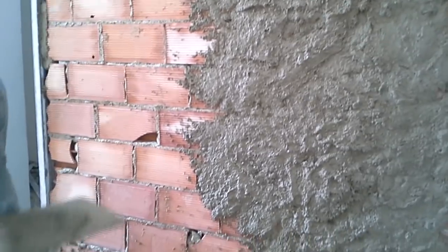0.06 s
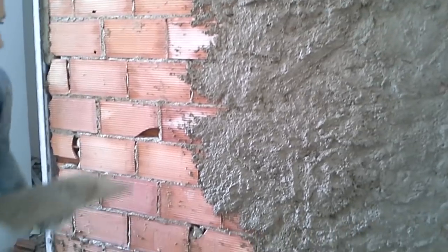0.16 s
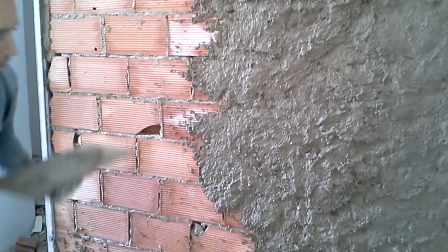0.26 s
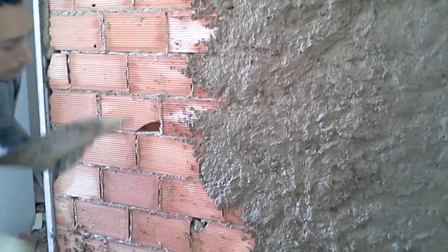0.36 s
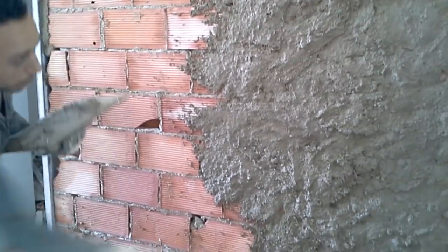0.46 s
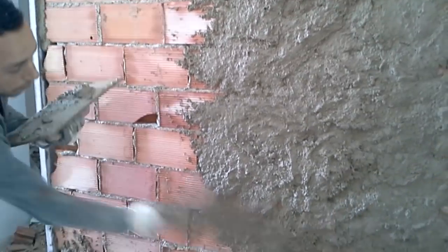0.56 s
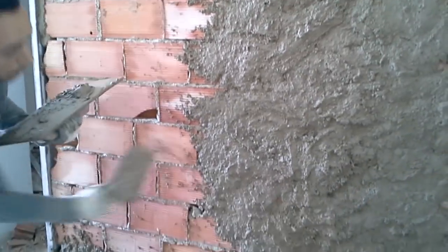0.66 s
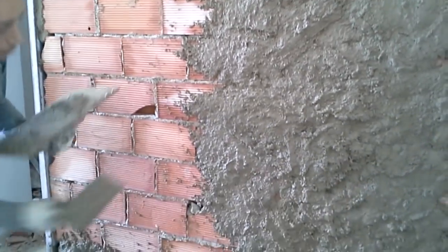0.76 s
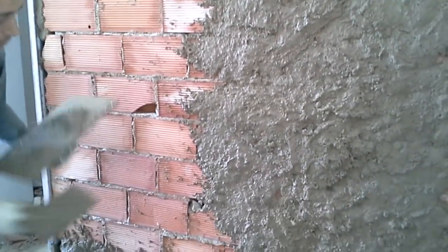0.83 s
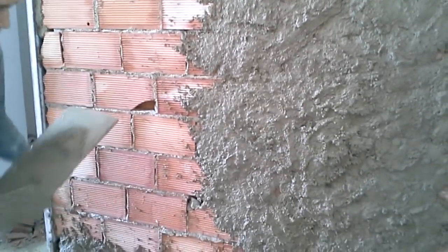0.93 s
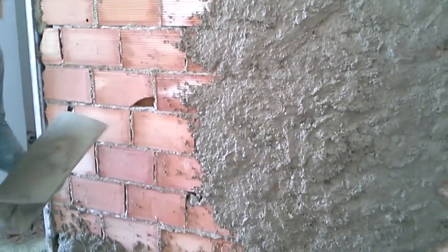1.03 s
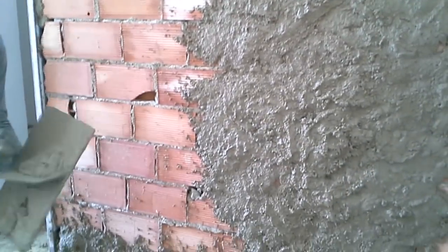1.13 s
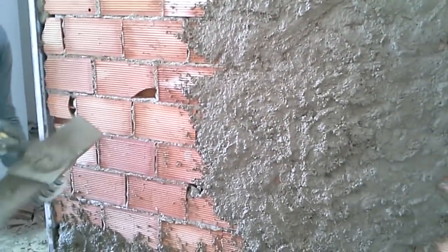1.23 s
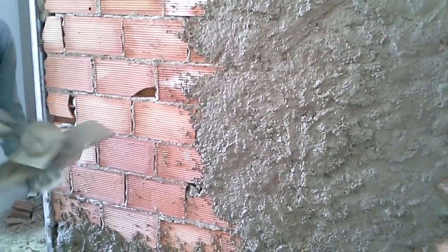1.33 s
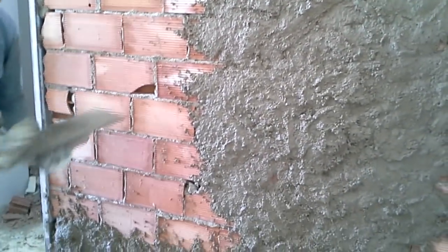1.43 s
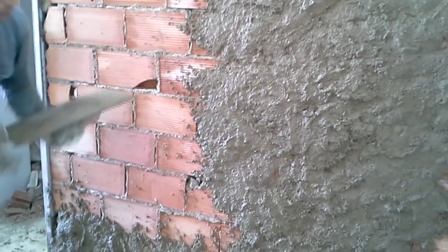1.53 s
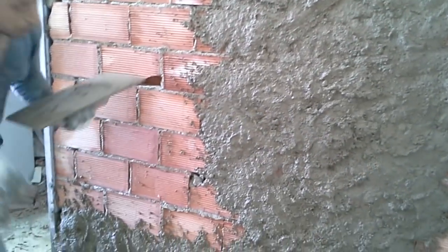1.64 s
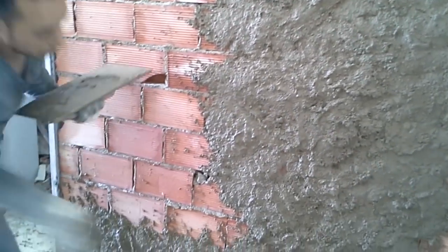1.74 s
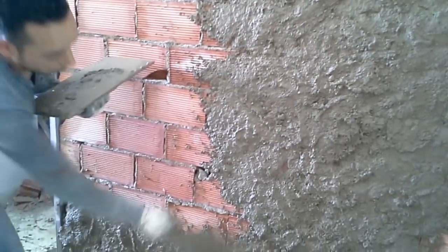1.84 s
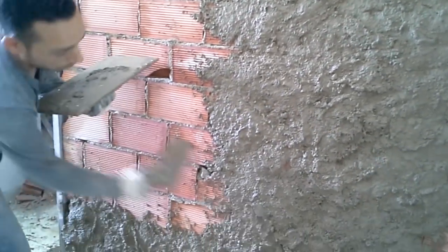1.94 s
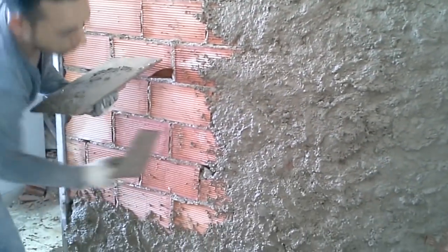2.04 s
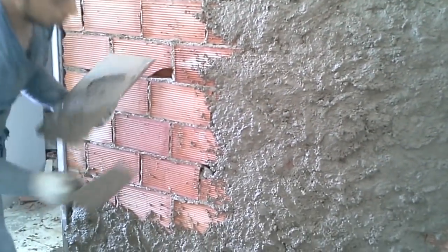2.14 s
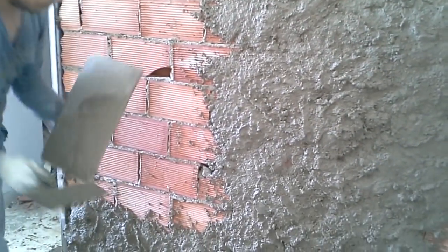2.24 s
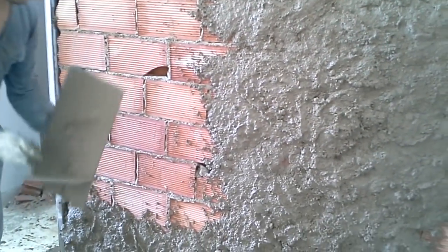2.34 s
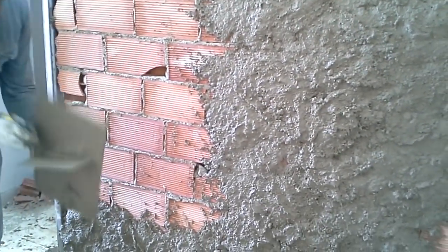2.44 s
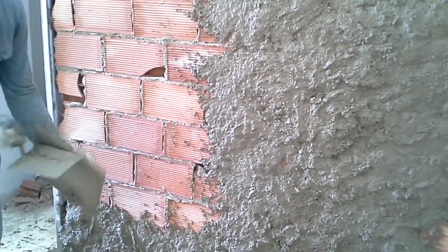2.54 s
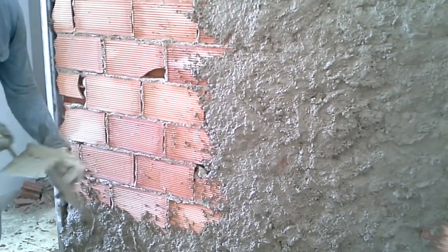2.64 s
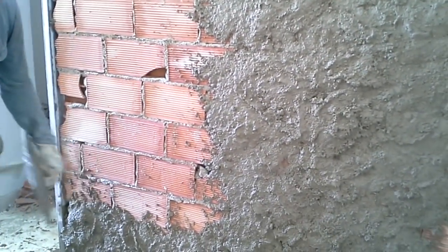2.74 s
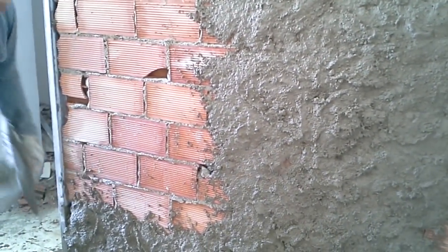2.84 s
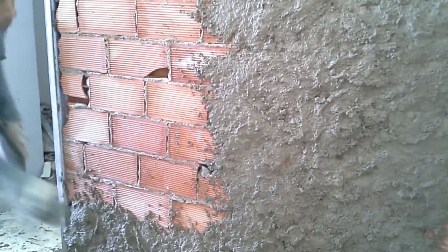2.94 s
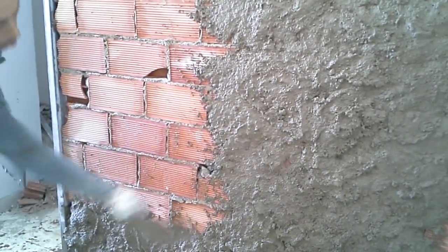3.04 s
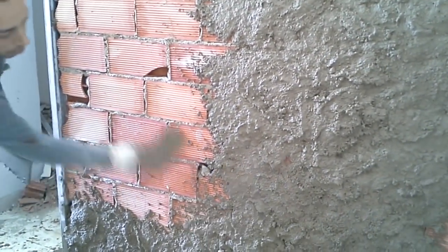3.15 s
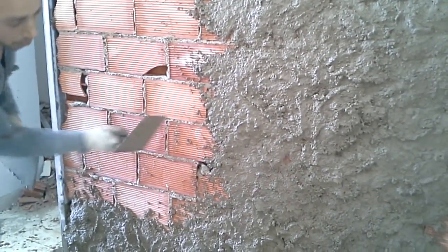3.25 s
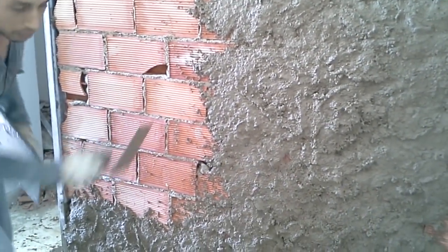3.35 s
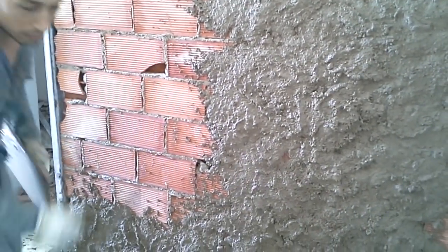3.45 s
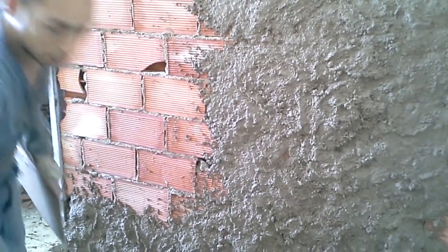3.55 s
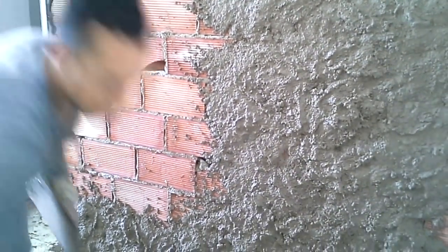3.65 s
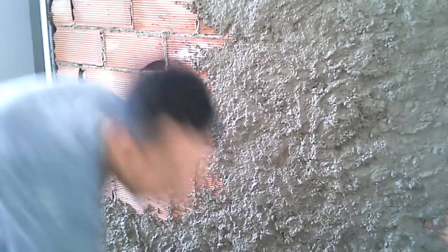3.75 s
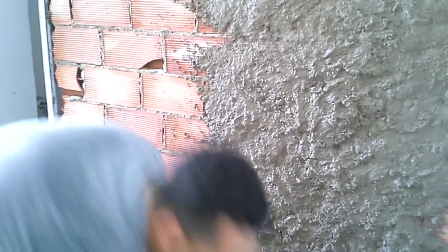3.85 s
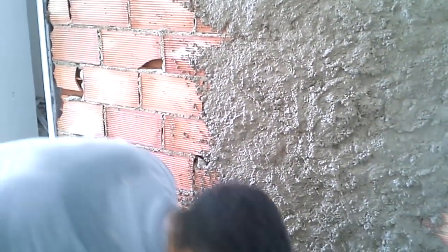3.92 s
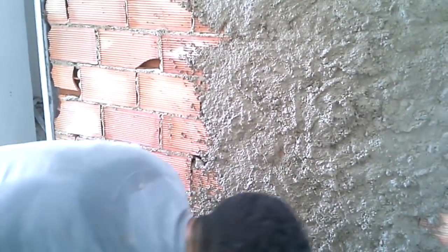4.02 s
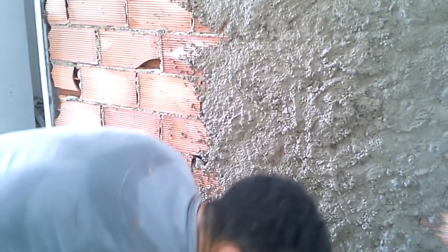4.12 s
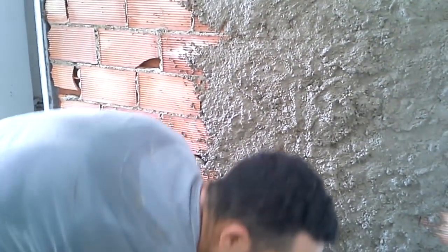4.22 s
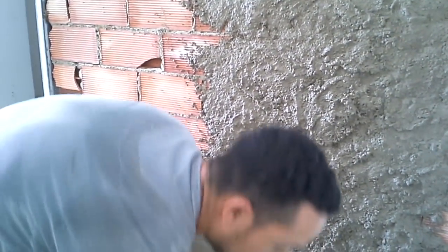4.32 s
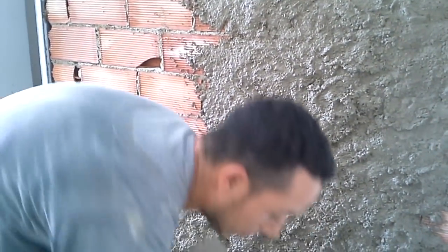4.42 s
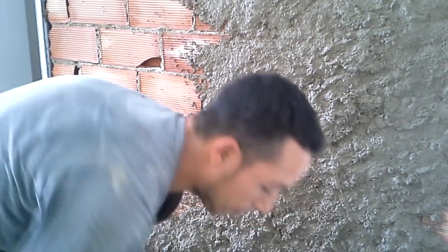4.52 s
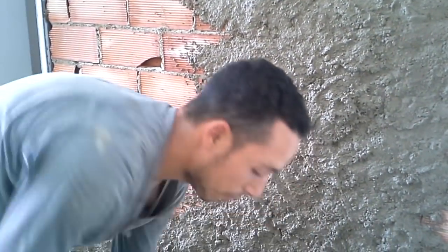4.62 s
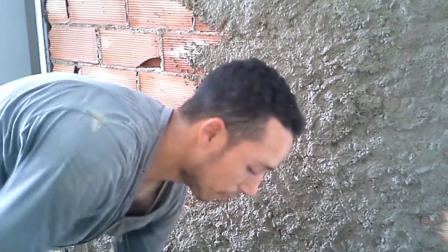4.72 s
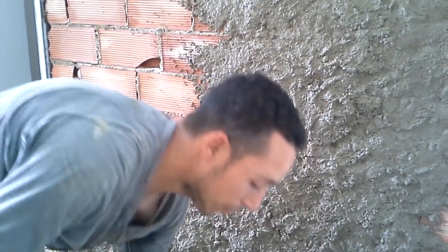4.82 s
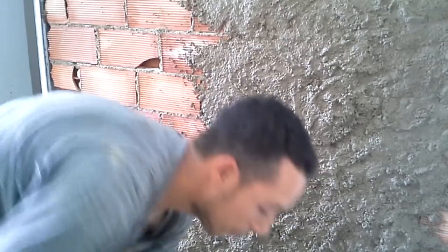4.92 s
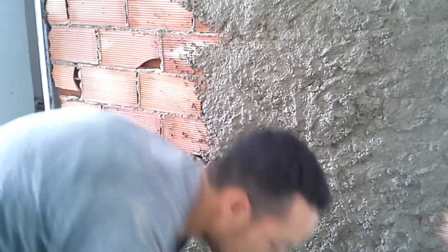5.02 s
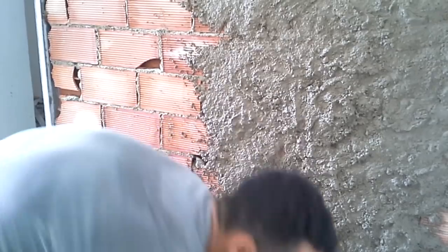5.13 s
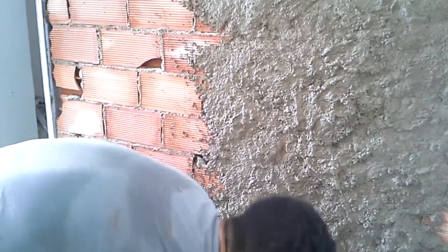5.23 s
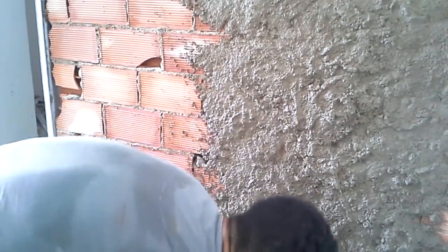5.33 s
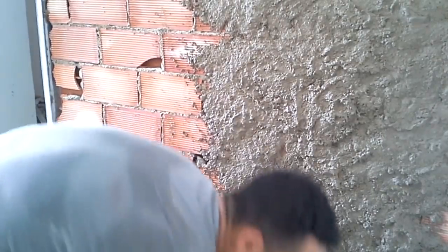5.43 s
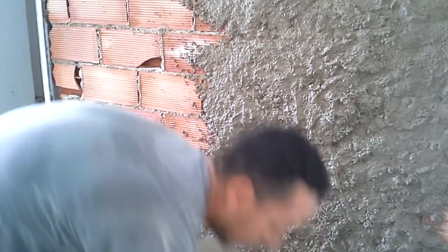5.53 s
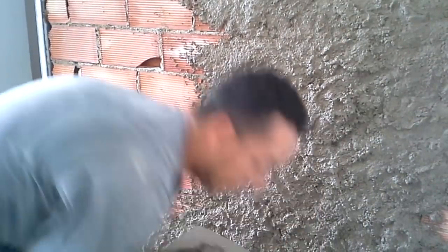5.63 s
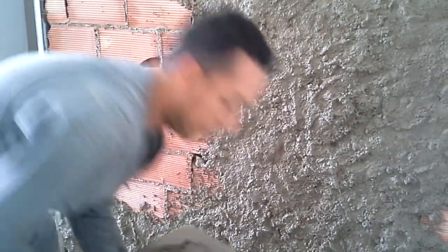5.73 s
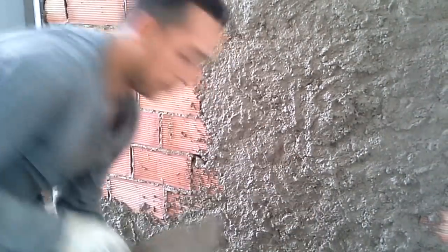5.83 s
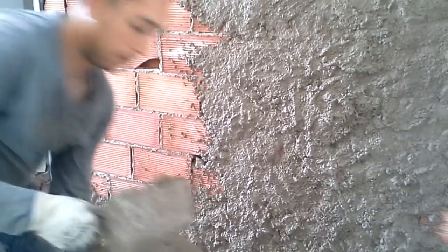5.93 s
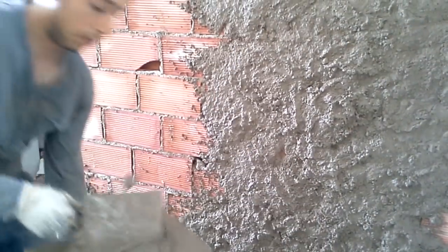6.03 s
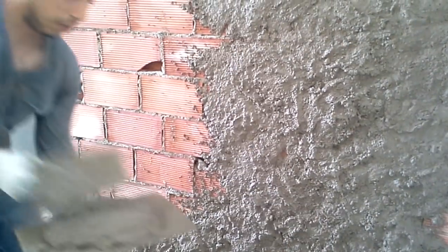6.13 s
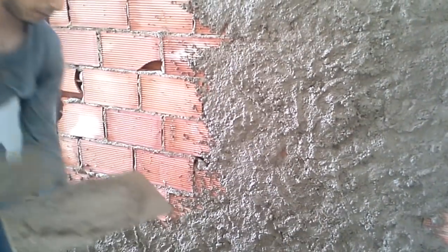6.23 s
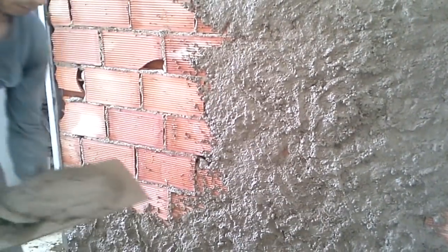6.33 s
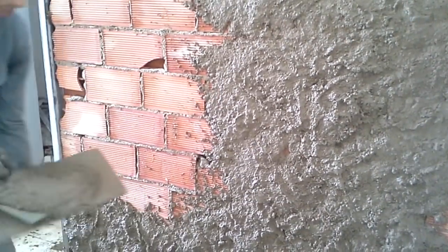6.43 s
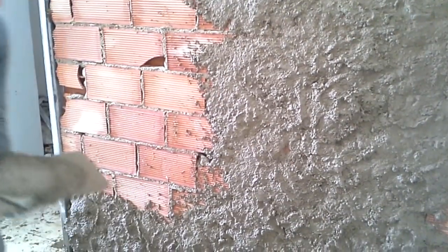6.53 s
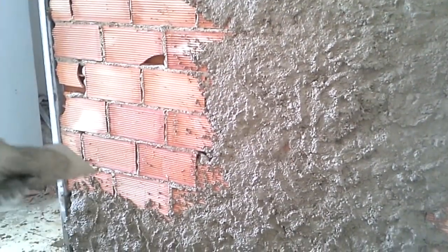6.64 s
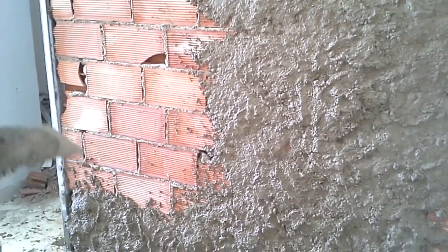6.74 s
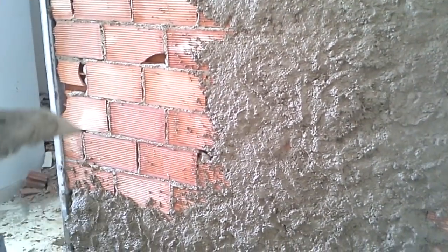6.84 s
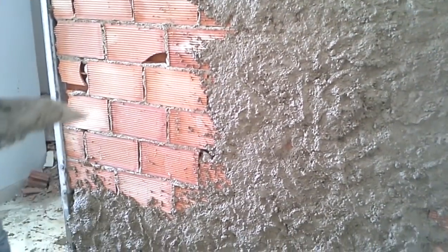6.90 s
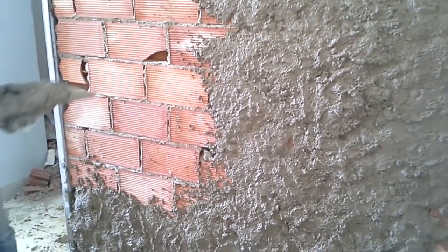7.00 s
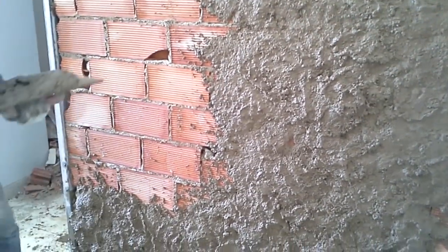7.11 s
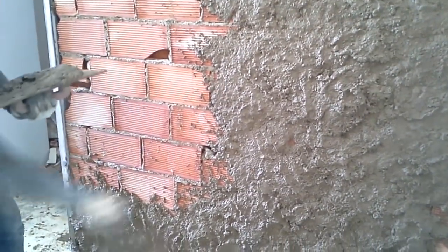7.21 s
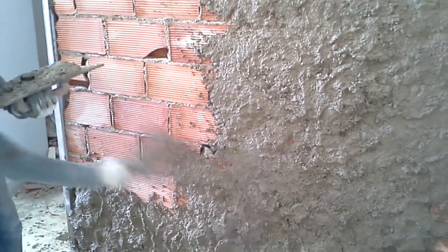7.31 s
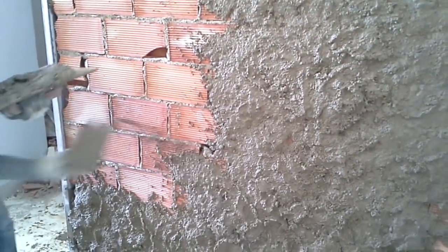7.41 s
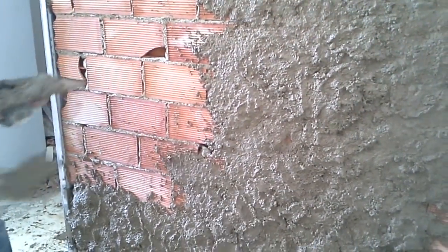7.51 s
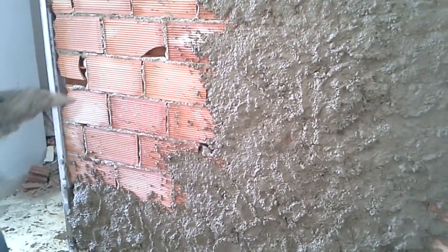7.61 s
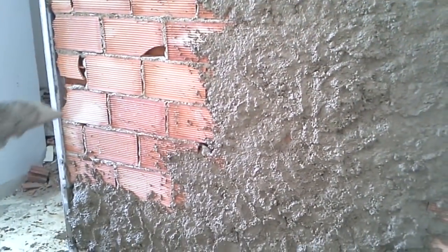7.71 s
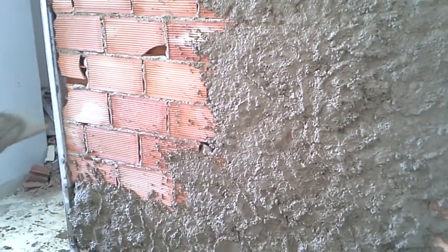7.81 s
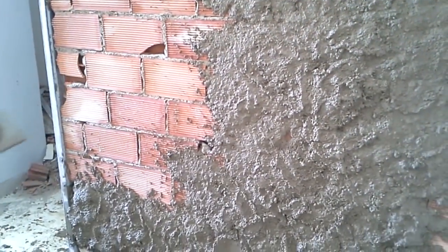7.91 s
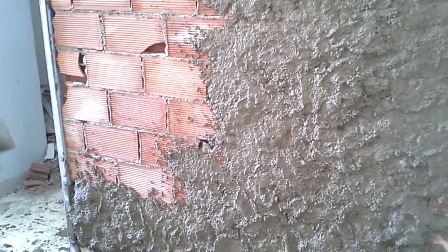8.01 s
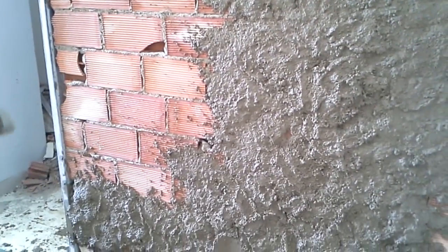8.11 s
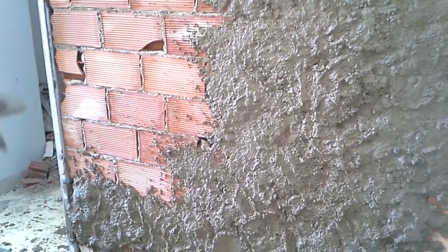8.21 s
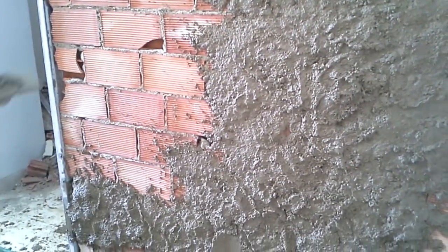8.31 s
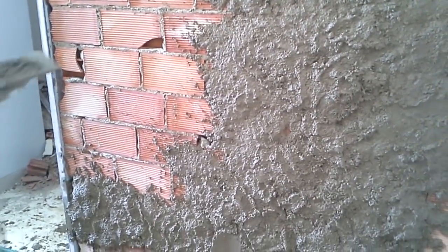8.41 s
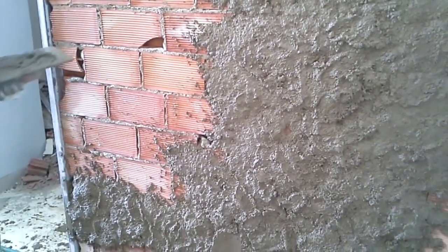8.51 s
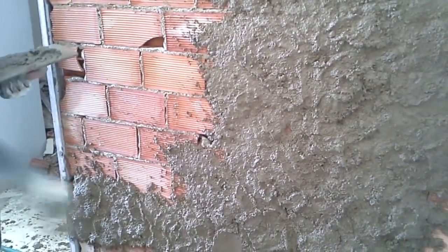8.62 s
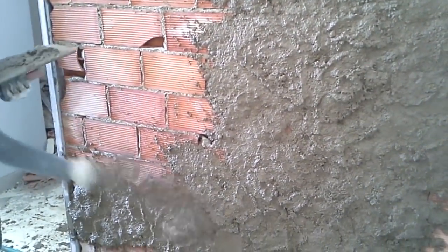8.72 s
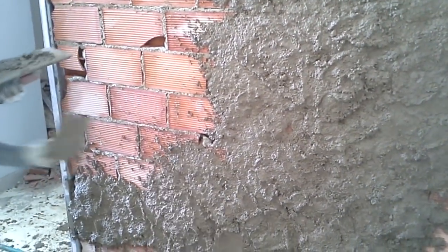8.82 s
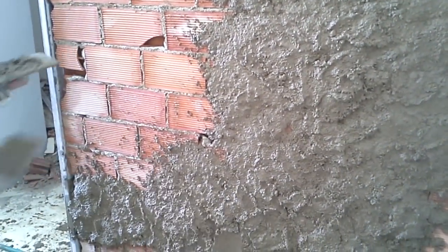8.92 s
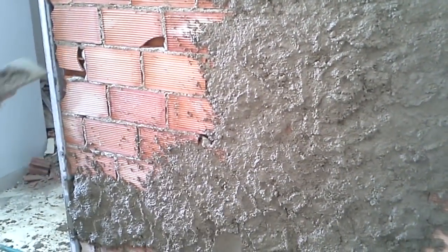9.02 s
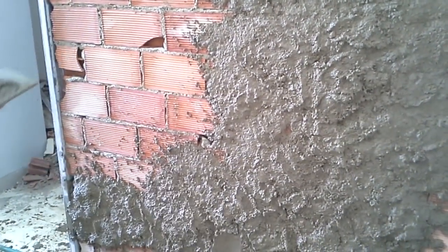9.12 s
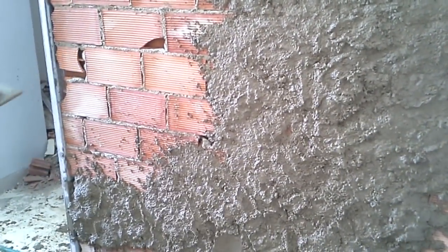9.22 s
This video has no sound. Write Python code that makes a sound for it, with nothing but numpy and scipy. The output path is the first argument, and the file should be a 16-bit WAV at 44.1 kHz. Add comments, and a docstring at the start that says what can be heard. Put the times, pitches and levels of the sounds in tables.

```python
"""Throwing mortar onto a wall

A plasterer flings wet mortar from a trowel onto a brick wall in a bare, echoing room.
Between throws he scrapes a new load off his hawk; halfway through he bends to dig more out of the tub.
Slaps, scrapes and knocks are random clicks sent through damped resonances and random reflections.
Faint site noise lies behind; a nearby stereo camera overloads on the hardest throws."""
import sys
import numpy as np
from scipy import signal
from scipy.fft import rfft, irfft, next_fast_len
from scipy.io import wavfile

SR = 44100
rng = np.random.default_rng(int(sys.argv[2]) if len(sys.argv) > 2 else 0)


def bounce(signal):
    """Save signal as a 16-bit WAV file at the path given by the first command-line argument."""
    frames = np.transpose(np.atleast_2d(signal))
    limited = np.clip(frames, -1, 1)
    pcm = np.round(limited * 32767).astype(np.int16)
    wavfile.write(sys.argv[1], SR, pcm)


N = 408366  # length of the scene [samples]


# throws that hit the wall: (time [s], level [dB], bass [dB], treble [dB],
# wall boom against the slap [dB], thud of the lump [Hz], smack of the trapped air [Hz])
SLAPS = [(0.0887, -9, 3.5, -4, -13.5, 637, 1400), (1.3903, -12, 2.5, -0.5, -14, 294, 3260),
         (2.6240, -15.5, 3.5, 3.5, -20.5, 282, 820), (6.8225, -6.5, -4, -11, -19.5, 311, 1530),
         (8.2474, -8, 4.5, -3.5, -18.5, 208, 1260)]
# spectrum of the wet splat: (frequency [Hz], relative level [dB per Hz])
SPLAT_SPECTRUM = [(30, 1), (80, -15), (170, -6.5), (290, -12), (420, -7.5), (700, 0.5), (1500, -1),
                  (2500, -4.5), (4200, -4), (7000, -11), (10000, -17.5), (15000, -32)]
# resonances of the wall: (frequency [Hz], width [Hz], relative level [dB])
WALL_MODES = [(83.2, 3.1, -1), (148.1, 3.7, -0.5), (194, 9.7, -18), (289, 6.5, -13)]
SPATTER_S = 0.014  # decay time of the spatter [s]
SMACK_DB = 1  # thud and smack against the splat, on top of the slap's own level [dB]


def slaps():
    """Each load lands on a new spot: the lump thuds, air smacks out from under it, and the wall booms."""
    out = np.zeros((2, N))
    wall = blow(ring(WALL_MODES, size=32768))
    for start, db, bass_db, treble_db, boom_db, thud_hz, smack_hz in SLAPS:
        tones = ring([(thud_hz, thud_hz / 7, -2), (smack_hz, smack_hz / 3, 0)])
        # the share of thud and smack grows with the throw
        lump = body(colour(SPLAT_SPECTRUM, bass_db, treble_db), tones, db + SMACK_DB)
        splat = signal.fftconvolve(impact(0.0041, SPATTER_S, spatter_db=-6), lump)
        add(out, start, undb(db) * room(splat, direct_db=-6.5, lead_s=0))
        # the long waves of the boom reach both microphones alike
        add(out, start, undb(db + boom_db) * wall)
    return out


def impact(squash_s, spatter_s, spatter_db):
    """A contact or a wet lump landing: a dense crack while it flattens, then sparser droplets."""
    t = seconds(0.13)
    crack = grains(t, 16000, 1.4) * (np.exp(-t / squash_s) - np.exp(-4 * t / squash_s))
    spatter = grains(t, 3000, 4.07) * np.exp(-t / spatter_s)
    burst = blow(crack) + undb(spatter_db) * blow(spatter)
    return blow(even(even(burst)))


SLIDE_S = 0.055  # the slide fills this time before each slap [s]
SLIDE_FIRST_DB, SLIDE_LAST_DB = -39.5, -28  # level at its start and end [dB]
SLIDE_BASS_DB, SLIDE_TREBLE_DB, SLIDE_RING_DB = -9, 16, -10


def slides():
    """Strokes of the load leaving the trowel in the swing: a hiss that grows until the slap."""
    return [(slap - SLIDE_S, SLIDE_S, SLIDE_FIRST_DB, SLIDE_LAST_DB,
             SLIDE_BASS_DB, SLIDE_TREBLE_DB, SLIDE_RING_DB) for slap, *_ in SLAPS]


# the trowel takes a new load off the hawk: (touch [s], bite [s], run-out length [s], level at the touch [dB],
# level at the bite [dB], bass [dB], treble [dB], steel ring [dB], knock of the bite [dB])
SCOOPS = [(.551, 0.597, .04, -13, -13, 19, -1, 0.5, -17),
          (1.883, 1.921, .18, -13, -11.5, 13, -3, -2, -12.5),
          (7.36, 7.474, 0.024, -17.5, -14, -6.5, 0.5, -28, -20),
          (8.758, 8.862, 0.039, -25.5, -21, 10, 3.5, -8, -19.5)]
# after the bite, all against the push [dB]
RUN_OUT_FIRST_DB, RUN_OUT_LAST_DB, RUN_OUT_BASS_DB, RUN_OUT_TREBLE_DB = -2, -8, -23, 5
SCRAPE_RING_DB = -17.5  # ring of the steel in run-outs and light strokes [dB]


def scoops():
    """Two strokes for each scoop: a push into the load, then a fading, thinner, brighter run-out."""
    pushes, run_outs = [], []
    for touch, bite, length, first_db, db, bass_db, treble_db, ring_db, _ in SCOOPS:
        pushes.append((touch, bite - touch, first_db, db, bass_db, treble_db, ring_db))
        run_outs.append((bite, length, db + RUN_OUT_FIRST_DB, db + RUN_OUT_LAST_DB,
                         bass_db + RUN_OUT_BASS_DB, treble_db + RUN_OUT_TREBLE_DB, SCRAPE_RING_DB))
    return pushes + run_outs


# light strokes that gather and smooth the mortar on the hawk:
# (time [s], length [s], level at the start [dB], treble [dB])
SCRAPES = [(0.438, 0.13, -52, 15), (2.09, .11, -21, -14), (2.361, 0.16, -48, 7.5), (3.094, 0.39, -41, 8),
           (5.287, 0.37, -38.5, 8), (5.875, .1, -20.5, -2), (5.985, .14, -24, 9.5),
           (6.158, 0.087, -32.5, 4), (6.473, 0.071, -36, 1), (6.559, 0.23, -43, 6), (6.869, 0.051, -9, 10),
           (7.036, 0.047, -16, 13), (7.08, .14, -32, -8), (7.239, 0.13, -39, 4), (7.819, 0.21, -38.5, 10),
           (8.012, 0.048, -31, -1), (8.109, 0.18, -30, 13), (9.079, 0.14, -54, 2)]
REST_DB, SCRAPE_BASS_DB = -45.5, 7.5  # level at the end of each stroke, and its bass [dB]


def scrapes():
    """Light strokes: however firmly they start, they end under the blade's own weight."""
    return [(start, length, first_db, REST_DB, SCRAPE_BASS_DB, treble_db, SCRAPE_RING_DB)
            for start, length, first_db, treble_db in SCRAPES]


# spectrum of gritty mortar under the blade: (frequency [Hz], relative level [dB per Hz])
GRIT_SPECTRUM = [(40, -92.5), (110, -22), (200, -14.5), (320, -3), (500, -0.5), (850, 3.5), (1300, 3.5),
                 (2500, -1), (4300, -2.5), (7000, -8.5), (10000, -14), (15000, -27)]
# resonances of the steel blade: (frequency [Hz], width [Hz], relative level [dB])
STEEL_MODES = [(540, 25, -43), (641, 4.9, -1.5), (788, 96, 9.5), (916, 20, 4.5), (924, 30, -29.5),
               (1110, 31, -3), (1494, 32, -0.5), (1860, 160, -1), (2066, 42, -7), (2720, 40, -45),
               (3610, 50, -8)]


def hawk():
    """Slides, scoops and scrapes: sandy mortar crunches and the steel blade rings."""
    return strokes(slides() + scoops() + scrapes(), GRIT_SPECTRUM, STEEL_MODES,
                   rate=2200, spread_db=4.5, judder_db=5.5, judder_hz=125.6,
                   pop_db=-10, pop_low_hz=647, pop_high_hz=2420, direct_db=-5.5)


# the trowel digs and cuts in the tub:
# (time [s], length [s], level at the start [dB], bass [dB], treble [dB])
DIGS = [(3.408, 0.032, -14, 1, 3), (3.448, .19, -32, -2, 7), (3.676, 0.096, -25, -3.5, -14),
        (3.788, 0.05, -28.5, -7, -2.5), (4.152, 0.074, -40, 6, 18), (4.208, 0.026, -21.5, 0.5, 16),
        (4.621, .055, -43, -5, 8), (4.712, 0.036, -23, -14, 15), (4.734, 0.022, -14, -30, 5),
        (4.822, .1, -30, 1, -19), (5.141, 0.031, -40.5, -24, -3)]
DIG_FADE_DB, DIG_RING_DB = 5, -11.5  # loss of level over each dig; ring of the tub [dB]


def digs():
    """Strokes in the tub, all losing the same force as the mix gives way."""
    return [(start, length, first_db, first_db - DIG_FADE_DB, bass_db, treble_db, DIG_RING_DB)
            for start, length, first_db, bass_db, treble_db in DIGS]


# spectrum of the mix in the tub: (frequency [Hz], relative level [dB per Hz])
MUD_SPECTRUM = [(40, -76), (110, -15), (250, 8.5), (450, 6.5), (900, 1), (1500, -2), (2600, -5),
                (4500, -7.5), (8000, -15), (15000, -24.5)]
# resonances of the tub: (frequency [Hz], width [Hz], relative level [dB])
TUB_MODES = [(237, 67, -18), (314, 39, 10), (420, 41, 11), (626, 37, 13.5), (700, 50, 5), (945, 85, 15.5)]


def tub():
    """Digs in the wet mix: fewer grains, lower air pops, and the ring of the tub."""
    return strokes(digs(), MUD_SPECTRUM, TUB_MODES,
                   rate=1500, spread_db=2, judder_db=9, judder_hz=111.8,
                   pop_db=-16, pop_low_hz=298, pop_high_hz=970, direct_db=-2)


def strokes(table, spectrum, modes, rate, spread_db, judder_db, judder_hz,
            pop_db, pop_low_hz, pop_high_hz, direct_db, edge_s=0.0042):
    """Steel drags through mortar: grains crunch under a blade that sticks and slips, and the mix squelches."""
    out = np.zeros((2, N))
    rung = ring(modes)
    for start, length, first_db, last_db, bass_db, treble_db, ring_db in table:
        t = seconds(length)
        slips = rng.uniform(-1.5, 1, int(length * judder_hz) + 2)
        judder = undb(judder_db * np.interp(t * judder_hz, np.arange(len(slips)), slips))
        edges = np.clip(np.minimum(t, length - t) / edge_s, 0, 1)
        pressure = undb(np.linspace(first_db, last_db, len(t))) * edges
        force = pressure * unit(even(judder * grains(t, rate, spread_db)))
        sound = signal.fftconvolve(force, body(colour(spectrum, bass_db, treble_db), rung, ring_db))
        # a bright, dry scrape squelches less than a dull, deep one
        squelch = pressure * pops(t, 90, pop_low_hz, pop_high_hz, cycles=4.2, glide=0.076)
        add(sound, 0, undb(pop_db - treble_db / 2) * squelch)
        # the tools keep moving, so every stroke meets other reflections
        add(out, start, room(sound, direct_db))
    return out


def pops(t, rate, low_hz, high_hz, cycles, glide):
    """Air pockets open in the wet mix: brief resonances that rise in pitch."""
    out = np.zeros(len(t) + SR // 20)
    age = seconds(1 / 20)
    for place, pitch, size in rng.random((int(t[-1] * rate) + 1, 3)):
        turns = low_hz * (high_hz / low_hz) ** pitch * age
        rising = turns * (1 + glide * np.tanh(turns / cycles))
        pop = np.exp(-turns / cycles) * np.cos(2 * np.pi * rising)
        add(out, place * t[-1], (0.25 + size) * pop)
    return unit(out[:len(t)])


# blade knocks and falling clots: (time [s], level [dB], treble [dB])
KNOCKS = [(1.084, -44, 5), (3.232, -45, 5), (3.497, -27.5, -6), (4.135, -32, -10), (4.211, -26, 2),
          (4.678, -35, -6), (4.930, -33, -8), (5.541, -29.5, 4), (5.635, -44, 9), (5.844, -17, 4.5),
          (6.707, -39.5, -6), (7.144, -27, -15), (7.268, -35.5, 2), (7.818, -38, 9), (7.876, -40.5, 14),
          (8.639, -42.5, 0), (8.695, -44.5, 27)]
KNOCK_BASS_DB, KNOCK_RING_DB = 4.5, -8  # bass of every knock; steel ring of the lone ones [dB]
TOUCH_DB = -11.5  # knock of a scoop's touch, against the start of its push [dB]
SCOOP_KNOCK_TREBLE_DB, SCOOP_KNOCK_RING_DB = -6.5, 0.5


def contacts():
    """Lone knocks, and the touch and bite of each scoop: (time [s], level [dB], treble [dB], ring [dB])."""
    rows = [(start, db, treble_db, KNOCK_RING_DB) for start, db, treble_db in KNOCKS]
    for touch, bite, _, first_db, *_, bite_db in SCOOPS:
        rows.append((touch, first_db + TOUCH_DB, SCOOP_KNOCK_TREBLE_DB, SCOOP_KNOCK_RING_DB))
        rows.append((bite, bite_db, SCOOP_KNOCK_TREBLE_DB, SCOOP_KNOCK_RING_DB))
    return rows


def knocks():
    """Short contacts, damped by the mortar that clings to the tools."""
    out = np.zeros(N)
    steel = ring(STEEL_MODES)
    for start, db, treble_db, ring_db in contacts():
        response = body(colour(GRIT_SPECTRUM, KNOCK_BASS_DB, treble_db), steel, ring_db)
        knock = signal.fftconvolve(impact(0.002, 0.0045, spatter_db=2.0), response)
        add(out, start, undb(db) * knock)
    return out


# the steel edge sings on one narrow resonance: (time [s], length [s], pitch [Hz], level [dB])
SQUEALS = [(.548, 0.0397, 633, -9.5), (.552, 0.062, 1490, -18), (.548, 0.03, 2820, -23.5),
           (3.416, .042, 2060, -26), (8.102, 0.11, 4600, -33), (8.114, .15, 9900, -45)]
# sand caught under the edge rasps in a broad band: (time [s], length [s], centre [Hz], level [dB])
RASPS = [(3.091, .038, 2120, -36), (4.111, 0.012, 2340, -26.5), (4.73, 0.019, 3270, -21),
         (5.282, 0.033, 4080, -36), (6.476, 0.071, 1860, -38.5), (6.698, 0.026, 4150, -35),
         (7.438, 0.077, 3500, -13), (7.521, 0.13, 3200, -30.5), (7.876, 0.0062, 1900, -22),
         (8.757, 0.019, 1500, -21)]
SQUEAL_Q, RASP_Q = 35, 2.7  # pitch over width, approached by long friction
SETTLE_S = 0.017  # friction briefer than this stays much broader [s]
# the blade also groans at each bite, level against the bite's knock
GROAN_S, GROAN_HZ, GROAN_WIDTH_HZ, GROAN_DB = 0.034, 910, 170, 1


def frictions():
    """Squeals, rasps and groans: (time [s], length [s], pitch [Hz], width [Hz], level [dB])."""
    rows = []
    for table, q in [(SQUEALS, SQUEAL_Q), (RASPS, RASP_Q)]:
        for start, length, hz, db in table:
            rows.append((start, length, hz, hz / q * (1 + SETTLE_S / length), db))
    for _, bite, *_, bite_db in SCOOPS:
        rows.append((bite - GROAN_S / 4, GROAN_S, GROAN_HZ, GROAN_WIDTH_HZ, bite_db + GROAN_DB))
    return rows


def squeals():
    """Friction feeds one resonance of the blade for a moment."""
    out = np.zeros(N)
    for start, length, hz, width, db in frictions():
        t = seconds(length)
        swell = np.sqrt(np.abs(np.sin(np.pi * t / length)))
        rubbing = even(swell * grains(t, 6000, 0.57))
        # a second, broad resonance trims what lies far from the pitch
        resonance = signal.fftconvolve(ring([(hz, width, 0)]), ring([(hz, hz / 2, 0)], size=512))
        squeal = signal.fftconvolve(rubbing, resonance / np.linalg.norm(resonance))
        add(out, start, undb(db) * squeal)
    return out


# the blade bumps the side of the tub: (time [s], level [dB])
BUMPS = [(3.415, -24.5), (3.496, -32), (3.690, -34), (4.135, -38), (4.678, -36.5), (4.832, -37)]


def bumps():
    """Cushioned by the mortar, a bump wakes the resonances of the tub."""
    out = np.zeros(N)
    boom = blow(ring(TUB_MODES))
    for start, db in BUMPS:
        add(out, start, undb(db) * boom)
    return out


# spectrum of the site noise: (frequency [Hz], relative level [dB per Hz])
SITE_SPECTRUM = [(30, -27), (80, -17), (150, -7.5), (300, -7), (800, -6), (1500, -7), (3000, -9.5),
                 (5000, -9.5), (7000, -16), (15000, -22)]
# the background swells and ebbs: (time [s], level [dB])
SITE_LEVEL = [(0, -42.5), (1.2, -51.5), (3.0, -51.5), (4.1, -48.5), (5.2, -49.5), (5.8, -54), (6.4, -56.5),
              (7.0, -44), (9.2, -48.5)]


def site():
    """Faint noise of the building site: coloured random noise, with one second of lead-in."""
    level_db = np.interp(np.arange(N + SR) / SR - 1, *np.transpose(SITE_LEVEL))
    return signal.fftconvolve(undb(level_db) * rng.standard_normal(N + SR), colour(SITE_SPECTRUM))


# the room's reverberation: (frequency [Hz], time to fall by 60 dB [s])
ROOM_DECAY = [(80, 0.69), (200, 0.63), (450, 0.57), (800, 0.5), (1600, 0.52), (3500, 0.45), (7000, 0.46),
              (14000, 0.35)]


def room(x, direct_db, lead_s=0.0001, build_s=0.00077, spacing=0.14, size=24576):
    """From one place to two microphones: direct sound, then dense reflections that decay by frequency."""
    t = np.arange(size) / SR
    hz = np.arange(size // 2 + 1) * SR / size
    # long waves reach both microphones alike (spacing in m, speed of sound 343 m/s)
    alike = np.sinc(2 * hz * spacing / 343)
    mid, side = np.exp(2j * np.pi * rng.random((2, len(hz))))
    field = mid * np.sqrt(1 + alike) + np.array([[1], [-1]]) * side * np.sqrt(1 - alike)
    centres, t60s = np.transpose(ROOM_DECAY)
    response = 0
    for band, t60 in zip(np.eye(len(ROOM_DECAY)), t60s):
        reflections = irfft(field * lookup(np.c_[centres, band], hz))
        response = response + reflections * np.exp(-np.log(1000) * t / t60)
    response *= 1 - np.exp(-t / build_s)
    response /= np.sqrt(np.sum(response ** 2) / 2)
    # the direct sound reaches the second microphone lead_s later
    response[0, 0] += undb(direct_db)
    response[1, int(abs(lead_s) * SR)] += undb(direct_db)
    return signal.fftconvolve(x[None], response, axes=1)


def body(noise_response, ring_response, ring_db):
    """What a contact excites: a broad crunch plus the ring of the object, at unit energy."""
    response = undb(ring_db) * ring_response
    response[:len(noise_response)] += noise_response
    return response / np.linalg.norm(response)


def ring(modes, size=16384):
    """Response of unit energy of a few damped resonances; a wider one dies faster."""
    t = np.arange(size) / SR
    response = np.zeros(size)
    for hz, width, db in modes:
        decay = np.sqrt(width) * np.exp(-np.pi * width * t)
        response += undb(db) * decay * np.cos(2 * np.pi * hz * t)
    return response / np.linalg.norm(response)


def colour(points, bass_db=0, treble_db=0, bass_hz=420, treble_hz=2200, size=2048):
    """Causal response of unit energy: a spectrum with a bass and a treble shelf."""
    hz = np.arange(size // 2 + 1) * SR / size
    bass = bass_db / (1 + (hz / bass_hz) ** 4)
    treble = treble_db * hz ** 2 / (hz ** 2 + treble_hz ** 2)
    # folding the cepstrum gives minimum phase: the energy comes as early as possible
    cepstrum = irfft(np.log(undb(lookup(points, hz) + bass + treble)))
    cepstrum[1:size // 2] *= 2
    cepstrum[size // 2 + 1:] = 0
    response = irfft(np.exp(rfft(cepstrum)))
    return response / np.linalg.norm(response)


def grains(t, rate, spread_db):
    """Sand grains and bursting films of water: random clicks of very unequal size."""
    size = undb(spread_db * np.minimum(rng.exponential(size=len(t)), 4))
    hit = rng.random(len(t)) < rate / SR
    hit[0] = True
    return unit(hit * size * rng.choice([-1, 1], len(t)))


def even(x):
    """Spread a burst's energy evenly over all pitches, so that it has no tone of its own."""
    size = next_fast_len(2 * len(x), real=True)
    spectrum = rfft(x, size)
    flat = irfft(spectrum / (np.abs(spectrum) + 1e-12), size)[:len(x)]
    return flat * np.linalg.norm(x) / np.linalg.norm(flat)


def undb(db):
    """Decibels to gain."""
    return 10 ** (np.asarray(db) / 20)


def unit(x):
    """Scale to rms 1."""
    return x / np.sqrt(np.mean(x ** 2))


def blow(x):
    """Scale a short sound to the energy of 1 / 20 s at rms 1."""
    return x / np.sqrt(np.sum(x ** 2) * 20 / SR)


def seconds(length):
    """Time axis [s]."""
    return np.arange(max(int(length * SR), 2)) / SR


def lookup(points, hz):
    """Read (frequency [Hz], value) points on a log-frequency axis."""
    f, value = np.transpose(points)
    return np.interp(np.log(hz + 1), np.log(f), value)


def add(track, start, x):
    """Mix x into the track from a start time [s] on."""
    i = max(int(start * SR), 0)
    track[..., i:i + x.shape[-1]] += x[..., :max(N - i, 0)]


def scene():
    """Wall, hawk, tub and blade sound from different places in the same room, over the site noise."""
    blade = room(knocks() + squeals() + bumps(), direct_db=-4.5)[:, :N]
    # drop the lead-in, so that the reverberation has already built up
    background = room(site(), direct_db=-21)[:, SR:SR + N]
    return slaps() + hawk() + tub() + blade + background


# the microphones face different ways: (frequency [Hz], left minus right [dB])
BALANCE = [(100, -3.5), (300, -1), (700, -2.5), (1300, -0.5), (2000, 4), (2700, 5.5), (4500, 11.5),
           (8000, 6), (13000, -0.5)]
LOW_CUT_HZ, TOP_HZ = 98, 14750


def record(dry):
    """The two microphones colour the sound and shed the deep bass; the loudest peaks clip, and the top is cut."""
    size = next_fast_len(N, real=True)
    tilt_db = lookup(BALANCE, np.arange(size // 2 + 1) * SR / size)
    # half of the difference goes to each side
    gain = undb(np.array([[0.5], [-0.5]]) * tilt_db)
    heard = irfft(rfft(dry, size) * gain, size)[:, :N]
    low_cut = signal.butter(4, LOW_CUT_HZ, "high", fs=SR, output="sos")
    clipped = np.clip(signal.sosfilt(low_cut, heard), -1, 1)
    top_cut = signal.ellip(10, 0.2, 80, TOP_HZ, fs=SR, output="sos")
    return signal.sosfilt(top_cut, clipped)


dry = scene()
out = record(dry)
bounce(out)
```